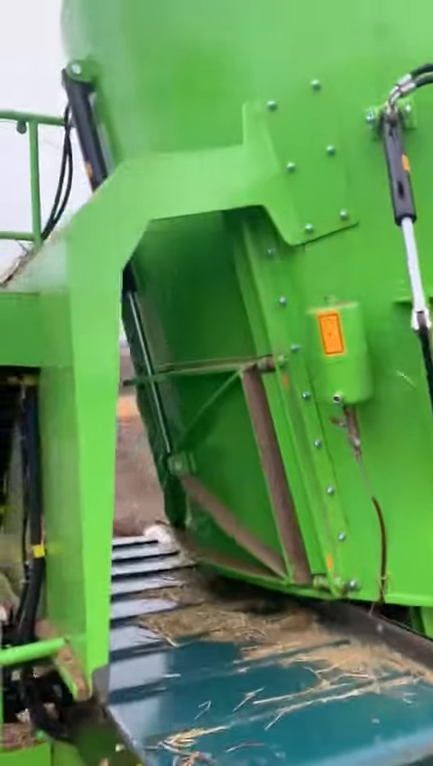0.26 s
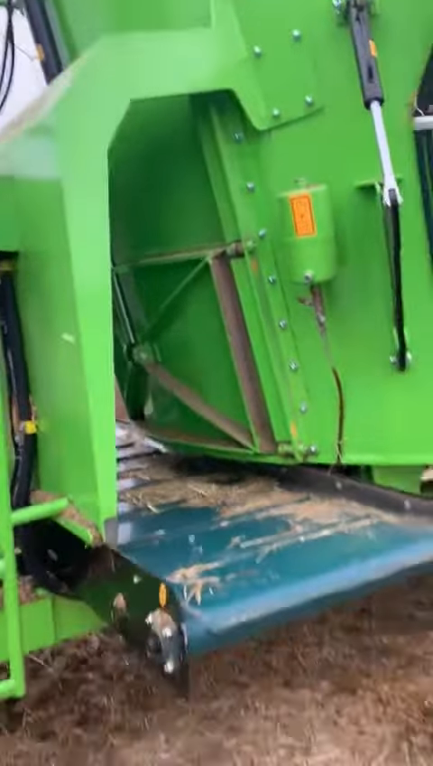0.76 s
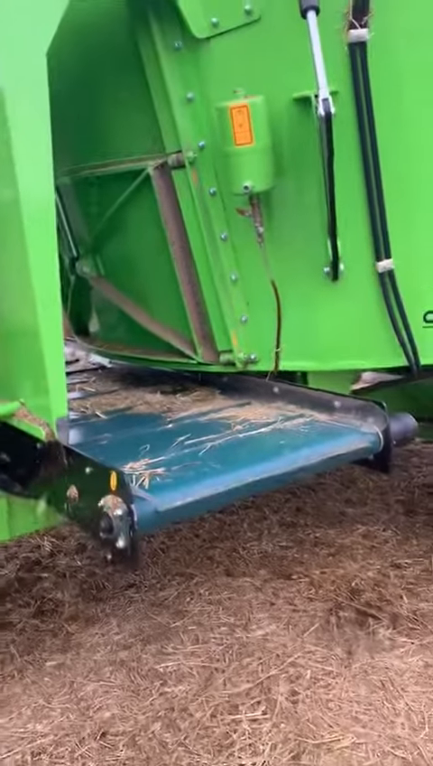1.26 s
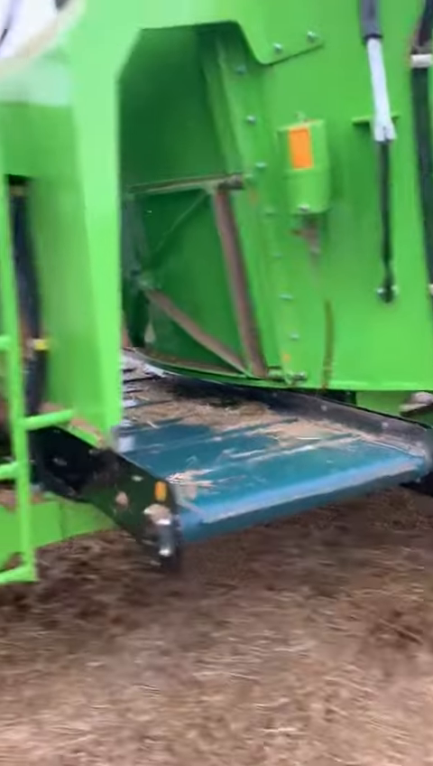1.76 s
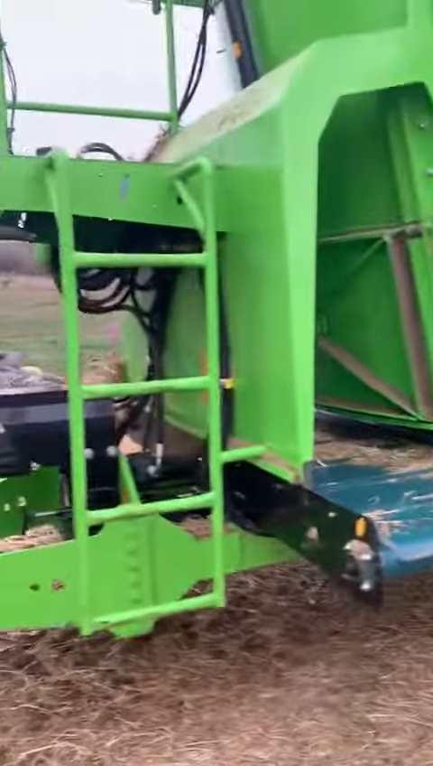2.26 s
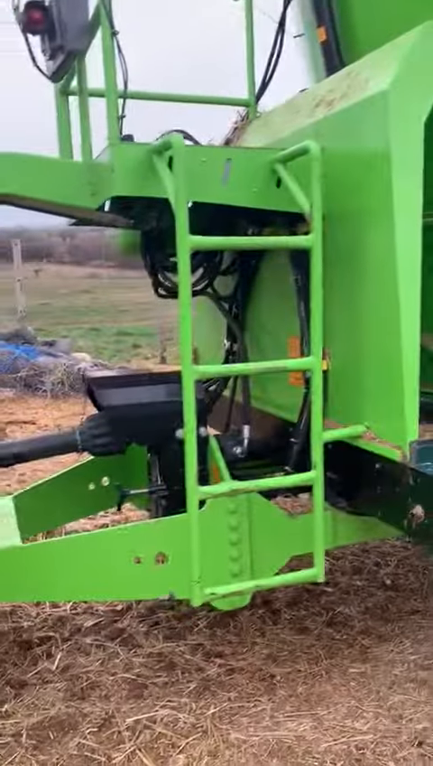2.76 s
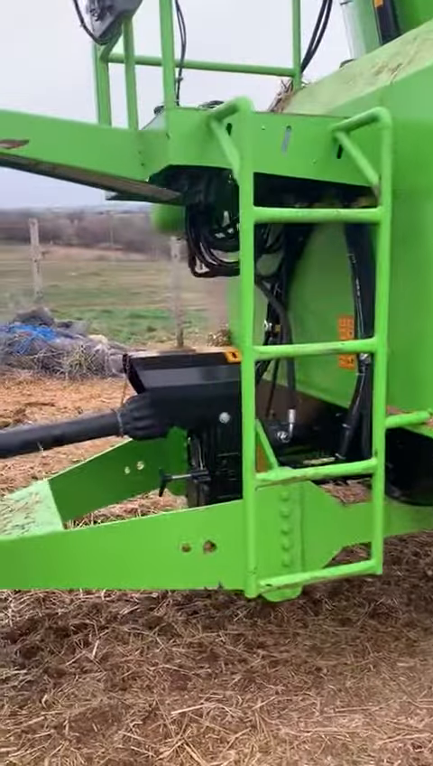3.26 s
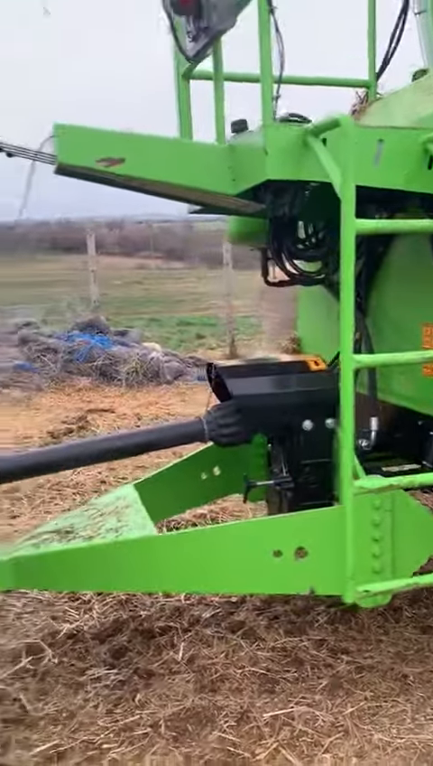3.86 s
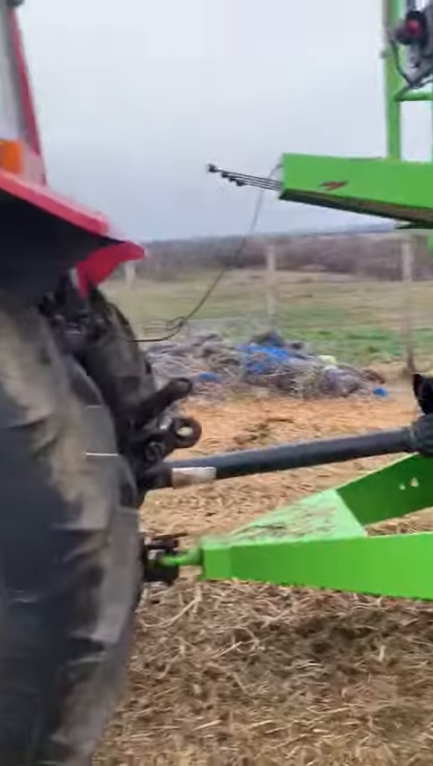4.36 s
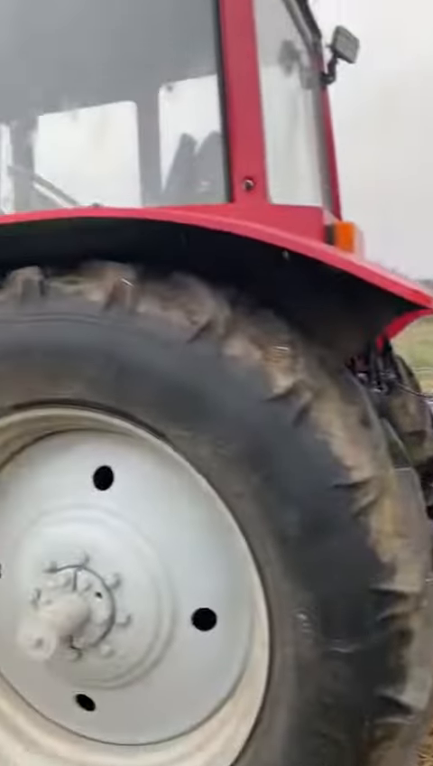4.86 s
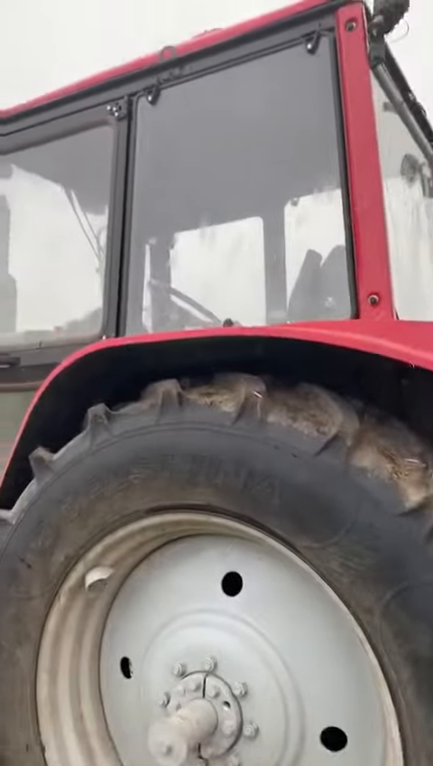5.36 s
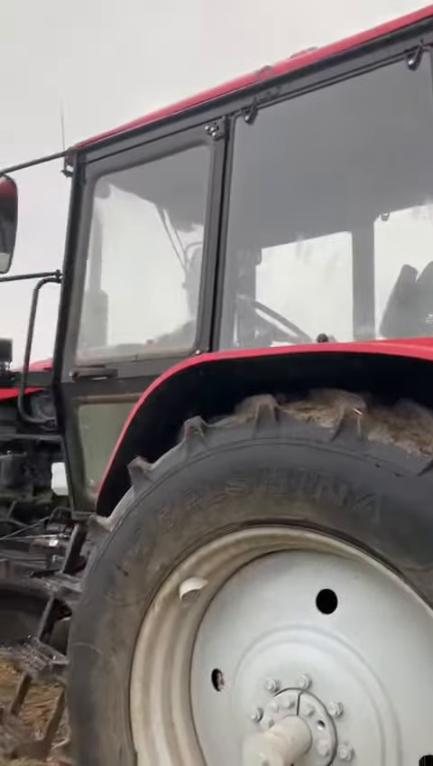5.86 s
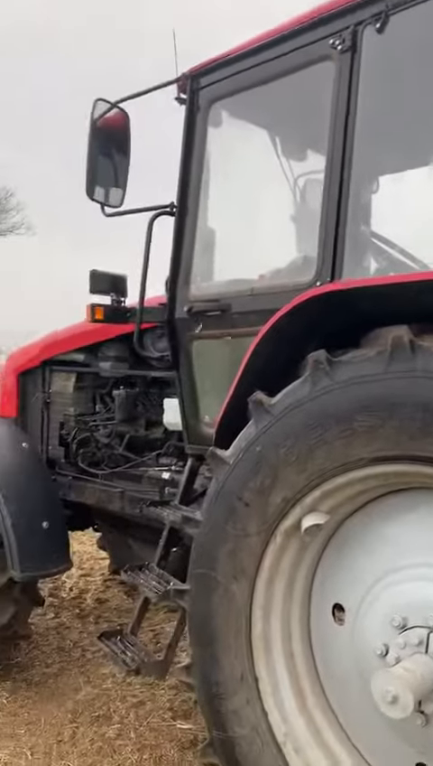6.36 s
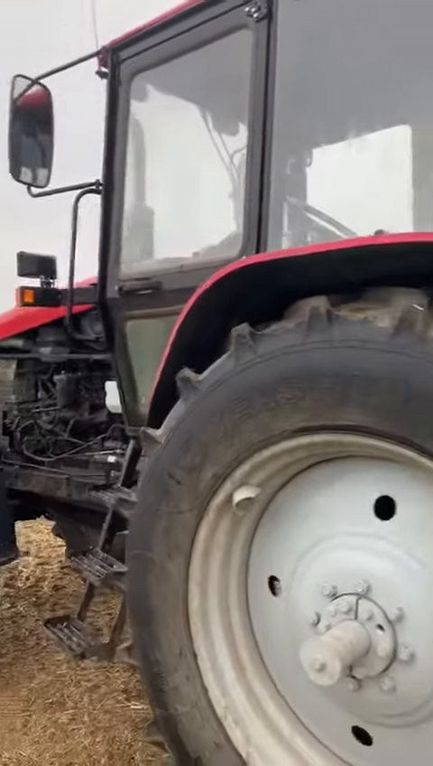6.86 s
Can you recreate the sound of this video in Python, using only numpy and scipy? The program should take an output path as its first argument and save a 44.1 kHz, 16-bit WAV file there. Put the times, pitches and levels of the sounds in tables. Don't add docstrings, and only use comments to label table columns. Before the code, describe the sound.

In an open farmyard, a four-cylinder tractor diesel runs steadily and fast, with dull knocking, tappet clatter and a whining wagon gearbox. Strong gusts slap and rumble on a handheld phone, heaviest in the first few seconds. As the walker leaves the wagon and reaches the tractor, the gear whine drops away and the injector hiss and clatter become louder, closer and brighter, with only scattered wind bumps.

```python
import sys
import numpy as np
from scipy import signal
from scipy.fft import rfft, irfft, next_fast_len
from scipy.io import wavfile
from scipy.ndimage import uniform_filter1d, map_coordinates

SR = 44100
rng = np.random.default_rng(int(sys.argv[2]) if len(sys.argv) > 2 else 0)


def to_wav(s):
    ch = np.atleast_2d(s).T
    pcm = np.round(np.clip(ch, -1, 1) * 32767)
    wavfile.write(sys.argv[1], SR, pcm.astype(np.int16))


def gain_from_db(level_db):
    decades = np.asarray(level_db, float) / 20
    return 10 ** decades


N = 313992

# time in seconds, corner in Hz below which sound is mono, width of the wind in dB.
WIND_GUARD = [(0, 394, -7.5), (2.6, 330, -2.5), (2.9, 192, -2), (3.6, 138, 6), (4.8, 50.3, 3),
              (5.5, 30.4, 2.5), (5.9, 200, 3), (6.4, 201, -33), (7.12, 268, -14)]


def unit(x):
    return x / np.sqrt(np.mean(x ** 2) + 1e-20)


def along(points, hz):
    f, v = np.transpose(points)
    return np.interp(np.log(hz + 1), np.log(f + 1), v)


def curves(rows):
    s, *cols = np.transpose(rows)
    return [np.interp(np.arange(N) / SR, s, c) for c in cols]


def wobble(rate, shape=lambda v: v):
    s = np.arange(0, N / SR + .01, .002)
    knots = rng.standard_normal(int(N * rate / SR) + 4)
    smooth = map_coordinates(knots, [s * rate])
    return np.interp(np.arange(N) / SR, s, shape(smooth))


def filtered(x, response):
    m = next_fast_len(N + 8192)
    return irfft(rfft(x, m) * response(np.fft.rfftfreq(m, 1 / SR)), m)[..., :N]


def ports(direct, diffuse):
    # frequency in Hz, phase lead of the left port in radians.
    left_lead = [(100, 0), (700, 1.8), (1500, 1.3), (2000, 2), (2600, 2.9), (3300, 3.2), (3900, 2.4),
                 (4500, 3.1), (5500, 3.4), (6050, 4.8), (7000, 6.3), (7700, 6.7), (8300, 7.9), (9000, 9.2),
                 (10300, 9.6), (11000, 11), (11600, 12.6)]
    # frequency in Hz, direct share of the power from 0 to 1.
    direct_share = [(100, .9), (500, .55), (1500, .72), (2600, .84), (3300, .82), (4000, .55), (4600, .93),
                    (5600, .97), (12000, .97)]

    def share(hz):
        return np.clip(along(direct_share, hz), 0, 1)

    def lead(hz):
        return np.sqrt(share(hz)) * np.exp(.5j * along(left_lead, hz) * np.array([[1], [-1]]))

    return filtered(direct, lead) + filtered(diffuse, lambda hz: np.sqrt(1 - share(hz)))


def patchy(x, depth_db):
    z = signal.stft(x, nperseg=1024)[2]
    field = rng.standard_normal(z.shape[1:])
    field = uniform_filter1d(uniform_filter1d(field, size=6, axis=0), size=10, axis=1)
    return signal.istft(z * gain_from_db(depth_db * unit(field)), nperseg=1024)[1][:, :N]


def tones(orders, firings, sway_db, slip):
    total = np.zeros(N)
    for multiple, db in orders:
        level = wobble(5, lambda v: np.sqrt(2) * gain_from_db(db + sway_db * v))
        total += level * np.sin(2 * np.pi * multiple * firings + slip * wobble(9))
    return total


def knocking(firings, spectrum, depth, sharp, cylinder_db, tick_db):
    # time in seconds, level in dB.
    panel_echo = [(0, 3.5), (.35, 6), (.65, 4.5), (.85, 1), (1.1, 2.5), (1.35, -3.5), (1.7, 1.5), (2.2, 2),
                  (2.6, 0.5), (3.3, 4), (3.7, 3.5), (4.4, 2.5), (4.9, 2), (5.3, 1), (5.6, 6.5), (6.1, 1),
                  (6.5, 2), (7.12, 3)]
    index = firings.astype(int)
    cylinder = np.array([1, -.6, .4, -1])[index % 4]
    each_firing = rng.standard_normal(index.max() + 1)[index]
    gate = 1 + depth * gain_from_db(cylinder_db * (cylinder + each_firing)) * np.exp(-sharp * (firings % 1))
    ticks = np.repeat(gain_from_db(tick_db * rng.standard_normal(N // 40 + 1)), 40)[:N]
    sway = wobble(7, lambda v: gain_from_db(.4 * v)) * wobble(20, lambda v: gain_from_db(.4 * v))
    direct, *diffuse = gate * ticks * sway * rng.standard_normal((3, N))
    echoes = gain_from_db(curves(panel_echo)[0] + 1.5 * wobble(14))
    return unit(filtered(ports(direct, echoes * np.array(diffuse)), spectrum))


def exhaust_beat(firings):
    # multiple of the firing rate, level in dB.
    exhaust_orders = [(1, -7), (1.5, -19), (2, -1.5), (2.5, -8.5), (3, -12), (5, -18.5), (7.5, -20.5)]
    # time in seconds, level of the beat in dB.
    beat_level = [(0, -32), (1, -29), (2, -30), (2.8, -25.5), (3.3, -27), (3.65, -23), (4, -27.5),
                  (4.6, -21), (5.1, -29.5), (5.5, -26.5), (6.1, -24.5), (6.5, -23.5), (7.12, -20.5)]
    return gain_from_db(curves(beat_level)[0]) * tones(exhaust_orders, firings, sway_db=2, slip=.7)


def block_knock(firings, near_db):
    # frequency in Hz, spectral level in dB per Hz.
    block_colour = [(30, -87), (70, 4.5), (200, 0), (290, -3), (450, 2.5), (700, 2.5), (1000, 0), (1450, 2),
                    (1800, 2), (2300, -16), (3000, -71), (4000, -120)]
    # centre in Hz, width in Hz, gain in dB.
    cover_rings = [(446, 23, 2.5), (1029, 57, 8), (1214, 120, 4), (1370, 360, 3)]

    def response(hz):
        rings_db = sum(db / (1 + (2 * (hz - centre) / width) ** 2) for centre, width, db in cover_rings)
        return gain_from_db(along(block_colour, hz) + rings_db)

    block = knocking(firings, response, depth=.6, sharp=2, cylinder_db=1.8, tick_db=.3)
    return gain_from_db(-28 + .6 * near_db) * patchy(block, 2.2)


def tappet_and_injector_clatter(firings, near_db, tappet_db):
    # frequency in Hz, spectral level in dB per Hz.
    tappet_colour = [(1200, -60), (1900, 0), (2300, 0), (3100, -4), (3800, -8), (4200, -8.5), (4450, -12),
                     (4700, -10), (5200, -12), (6000, -20), (7500, -60), (9000, -120)]
    # frequency in Hz, spectral level in dB per Hz.
    hiss_colour = [(3000, -60), (4800, -6), (5600, 0), (6500, 0), (7800, -3), (8100, 2), (9200, 0),
                   (10200, 0), (11500, -4), (11900, -15), (12150, -120)]
    tappets = knocking(firings, lambda hz: gain_from_db(along(tappet_colour, hz)),
                       depth=.5, sharp=2.5, cylinder_db=1.3, tick_db=.6)
    hiss = knocking(firings, lambda hz: gain_from_db(along(hiss_colour, hz)),
                    depth=.6, sharp=2, cylinder_db=1.8, tick_db=.5)
    shade_hz, shade_db = 8860, -4 + .25 * near_db
    hiss = hiss + (gain_from_db(shade_db) - 1) * filtered(hiss, lambda hz: hz > shade_hz)
    hiss_db = -45.5 + near_db + .97 * wobble(3.6) + .5 * wobble(10)
    return patchy(gain_from_db(tappet_db) * tappets + gain_from_db(hiss_db) * hiss, 1.8)


def pump_and_fan(firings, near_db):
    # multiple of the firing rate, level in dB.
    pump_orders = [(13, -39), (26, -35), (18, -41), (24, -41)]
    # multiple of the firing rate, level in dB.
    fan_orders = [(10 / 3, -32.5), (14 / 3, -37), (50 / 3, -37)]
    clear_s, clear_width_s, clear_db = 6.05, .27, 8
    unshaded_db = clear_db / (1 + np.exp((clear_s - np.arange(N) / SR) / clear_width_s))
    gain = gain_from_db(-7.5 + .26 * near_db + unshaded_db)
    return gain * tones([*pump_orders, *fan_orders], firings, sway_db=3.5, slip=1.6)


def wagon_gearbox(firings):
    # multiple of the firing rate, level in dB.
    gearbox_orders = [(3.08, 0), (6.16, -11), (9.24, -19), (15.75, -20), (20.4, -16)]
    # time in seconds, level in dB.
    gearbox_level = [(0, -34.5), (.8, -28.5), (1.8, -26.5), (2.9, -28.5), (3.6, -27), (4, -39.5),
                     (4.4, -49), (7.12, -55)]
    return gain_from_db(curves(gearbox_level)[0]) * tones(gearbox_orders, firings, sway_db=4, slip=2)


def upper_gear_whine(firings, tappet_db):
    # multiple of the firing rate, level in dB.
    whine_orders = [(52, -24), (208 / 3, -21), (78, -23)]
    return gain_from_db(tappet_db) * tones(whine_orders, firings, sway_db=4, slip=2)


def panel_glints(firings):
    # multiple of the firing rate, centre in seconds, half length in seconds, level in dB.
    glint_tones = [(15.75, 1.65, .5, -43), (9.24, 3.55, .35, -39), (16.6, 4.9, .55, -38),
                   (13, 6.6, .45, -40), (69.9, 5.6, .2, -45.5), (69.3, 6.58, .25, -50),
                   (7.45, 1.6, .6, -40), (10 / 3, 6.25, .4, -31), (23.8, 4.9, .45, -37),
                   (20.2, 5.6, .45, -37), (22.4, 3, .6, -39), (20.6, .9, .6, -40), (26, 6.8, .22, -38),
                   (16.4, 3.1, .5, -39), (9, 1.65, .45, -40), (10.4, 1.6, .3, -41), (7.5, 6.3, .75, -39),
                   (6.2, 4.1, .3, -42), (40, 5.9, .15, -44), (52, 6.65, .2, -48), (18, 6.3, .4, -38)]
    total = np.zeros(N)
    for multiple, s, half_s, db in glint_tones:
        swell, = curves([(s - 1.2 * half_s, 0), (s - .6 * half_s, 1),
                         (s + .6 * half_s, 1), (s + 1.2 * half_s, 0)])
        total += swell * tones([(multiple, db)], firings, sway_db=3, slip=min(.4 + multiple / 12, 1.8))
    return total


def engine():
    # time in seconds, firings per second (bent a little by the walker's steps).
    firing_rate = [(0, 60.2), (1.1, 60), (2.3, 60.3), (2.6, 59.6), (3.8, 59.6), (4.1, 58.85), (4.7, 59.7),
                   (5.05, 59.2), (5.5, 60.5), (6.1, 60.1), (6.6, 60.2), (7.12, 59.8)]
    # time in seconds, injector level relative to that at the wagon in dB.
    approach = [(0, -0.5), (1.1, 2), (1.9, 2.5), (2.6, 6.5), (3.3, 5.5), (3.7, 5), (4.1, 7.5), (4.7, 12),
                (5.1, 12), (5.6, 8.5), (6.1, 10), (6.5, 13), (7.12, 12)]
    firings = np.cumsum(curves(firing_rate)[0]) / SR + .43
    near_db, = curves(approach)
    tappet_db = -34 + .61 * near_db
    lines = exhaust_beat(firings) + pump_and_fan(firings, near_db)
    lines = lines + wagon_gearbox(firings) + upper_gear_whine(firings, tappet_db)
    noise = block_knock(firings, near_db) + tappet_and_injector_clatter(firings, near_db, tappet_db)
    return noise + ports(lines, np.zeros((2, N))) + panel_glints(firings)


def airflow():
    # time in seconds, level in dB.
    breeze = [(0, -23.5), (.45, -16), (.8, -25), (1.3, -23.5), (1.9, -24), (2.4, -17), (2.7, -27.5),
              (3.1, -26), (3.7, -27), (4.1, -28.5), (4.5, -29.5), (4.75, -26), (5.2, -24.5), (5.55, -31),
              (5.9, -25.5), (6.2, -31.5), (6.5, -21), (7.12, -28)]
    # centre in seconds, half length in seconds, level in dB, colour (0 rumble to 3 scrape).
    gusts = [(.075, .03, -21, 1.3), (.245, .055, -14, 1.5), (.32, .05, -16.5, 2), (.38, .022, -15, 2.5),
             (.57, .08, -20, 1.5), (.67, .03, -21, 1.2), (.965, .02, -17, 2.1), (1.045, .035, -17, 1.6),
             (1.11, .08, -18.5, 1.3), (1.45, .05, -23, .7), (1.82, .02, -21, 1.2), (1.88, .03, -20, 1.1),
             (2.02, .04, -22, .9), (2.17, .05, -16.5, 1.1), (2.25, .05, -17.5, 1.4),
             (2.325, .035, -17, 1.5), (2.52, .04, -20, 1.1), (2.8, .03, -21, .8), (2.85, .03, -19, 1.5),
             (3.04, .05, -21, .5), (3.35, .06, -23, .4), (3.56, .06, -21, .6), (3.985, .03, -22.5, 2),
             (4.41, .08, -23, .1), (4.83, .02, -22, .8), (4.95, .03, -21, 1.1), (5.06, .035, -23, 1.8),
             (5.165, .02, -24, 1.7), (5.24, .03, -22, .2), (5.28, .04, -18.5, 1.5), (5.42, .05, -18.5, 3),
             (5.7, .03, -25, .8), (5.98, .04, -24, .4), (6.33, .04, -24, 1.2), (6.6, .05, -23, 1.1),
             (6.9, .05, -24, 1.1)]
    t, layer = np.arange(0, N / SR + .01, .002), np.arange(4)[:, None]

    def loss_db(colour):
        above_db, below_db = 9, 5
        return np.where(layer > colour, above_db * (layer - colour) ** 2, below_db * (colour - layer))

    power = gain_from_db(np.interp(t, *np.transpose(breeze)) - loss_db(.2)) ** 2
    for s, half_s, db, colour in gusts:
        u = np.abs(t - s) / (np.abs(half_s) * np.where(t < s, .6, 1))
        power = power + gain_from_db(db - loss_db(colour)) ** 2 * np.exp(-u ** 2.6)
    return [np.interp(np.arange(N) / SR, t, np.sqrt(p)) for p in power]


def eddy_slaps():
    # start in seconds, peak
    # in dB, frequency in Hz.
    shed_eddies = [(0.052, -1.5, 453), (0.073, -4, 143), (0.227, 4, 434), (0.25, 3.5, 299),
                   (0.287, 1, 106), (0.306, 0, 483), (0.344, -1, 524), (0.369, 0.5, 372),
                   (0.371, 0.5, 68.5), (0.551, 0, 238), (0.571, -2, 104), (0.61, -4, 218),
                   (0.642, -4.4, 185), (0.673, -4.5, 273), (0.957, 2, 405), (1.012, 3.5, 334),
                   (1.038, 4, 373), (1.095, 2, 214), (1.126, -2, 370), (1.131, -1, 174),
                   (1.197, -4.5, 250), (1.427, -5, 141), (1.616, -6, 185), (1.81, -2.5, 181),
                   (2.011, -7, 218), (2.092, -2, 215), (2.125, -7.1, 320), (2.182, 2, 314),
                   (2.238, -2.5, 276), (2.264, -1.5, 457), (2.288, 0, 524), (2.311, 2, 297),
                   (2.315, 0, 122), (2.339, -1.5, 96), (2.351, 1.5, 468), (2.373, -5, 208),
                   (2.511, -4, 161), (2.545, -7.5, 376), (2.782, -7, 147), (2.852, 3.7, 94),
                   (2.872, -1, 234), (2.978, -1.5, 173), (3.005, -8, 171), (3.292, -8, 172),
                   (3.317, -7, 167), (3.507, -2.5, 113), (3.573, 0, 197), (4.37, -7, 134),
                   (4.401, -6, 145), (4.809, 0.5, 116), (4.937, -4, 142), (5.151, -5, 460),
                   (5.258, -3.5, 398), (5.275, -1, 303), (5.295, -12, 409), (5.402, -4.5, 517),
                   (5.402, 3, 106), (6.386, -5, 185), (6.592, -9, 218), (6.885, -10, 186),
                   (0.074, -6, 61.6), (.17, -5, 61), (.265, -5, 65.5), (.555, -8, 70), (0.664, -7.5, 61.6),
                    (.975, -6, 65.4), (1.046, -2, 64), (1.106, -15, 64), (1.44, -7, 69.4),
                    (1.804, -7, 62.7), (1.86, -7, 66.7), (2.165, -3, 71), (2.201, 1, 78), (2.234, -3, 62.6),
                    (2.315, -3, 62.7), (2.5, -11, 58.4), (3.01, -5, 66), (3.35, -8, 61), (3.572, -3, 60),
                    (4.329, -7, 63.5), (4.43, -8.5, 58), (4.815, -3, 71.4), (5.059, -9.5, 70.6),
                    (5.145, -3, 71), (5.222, -2, 70), (5.286, -12, 64.5), (5.375, -6, 74), (5.97, -8, 75),
                   (.213, -4.5, 605), (.258, 2.5, 620), (.304, -10, 835), (.37, -5, 1140), (.389, -4, 770),
                    (.962, -9, 895), (2.336, -5, 960), (2.828, -4, 800), (3.928, -10, 149),
                    (3.976, -3, 820), (3.992, -8, 428), (4.012, -6, 208), (5.405, -2, 895),
                    (5.43, 2.5, 1300)]
    t, slaps = np.arange(SR // 8) / SR, np.zeros(N + SR)
    for s, db, hz in shed_eddies:
        swell = t * hz / .93
        pulse = swell * np.exp(1 - swell) * np.cos(2 * np.pi * hz * t + rng.uniform(0, 2 * np.pi))
        slaps[round(s * SR):][:len(t)] += gain_from_db(db - 2) * pulse
    return slaps[:N]


def wind():
    # frequency in Hz, spectral level in dB per Hz.
    rumble = [(15, -47), (30, -18.5), (55, 0), (100, -1), (150, -4.5), (250, -19.5), (500, -120)]
    # frequency in Hz, spectral level in dB per Hz.
    flutter = [(40, -120), (80, -16.5), (150, 3.5), (250, 0.5), (400, -4.5), (700, -19.5), (1400, -120)]
    # frequency in Hz, spectral level in dB per Hz.
    rasp = [(120, -120), (250, -23.5), (400, 1), (650, -4.5), (1000, -13.5), (2000, -25), (4000, -120)]
    # frequency in Hz, spectral level in dB per Hz.
    scrape = [(250, -120), (500, -14), (800, 0), (1300, -3), (2200, -13), (4200, -120)]
    lumps_db = 1.6 * wobble(35)
    flow = np.zeros((2, N))
    for gain, colour, trim_db in zip(airflow(), (rumble, flutter, rasp, scrape), (-2, -1, -4, -3)):
        noise = filtered(rng.standard_normal((2, N)), lambda hz: gain_from_db(along(colour, hz)))
        flow += gain * gain_from_db(trim_db) * unit(gain_from_db(lumps_db + 1.8 * wobble(50)) * noise)
    both = flow[0] + gain_from_db(-9) * eddy_slaps()
    apart = flow[1] * gain_from_db(curves(WIND_GUARD)[1])
    return np.array([both + apart, both - apart])


def scene():
    return wind() + engine() * gain_from_db([[.4], [-.4]])


def band_limit(x):
    return signal.sosfilt(signal.butter(12, 12000, fs=SR, output="sos"), x)


def record(dry):
    x = dry / (1 + np.abs(dry / .95) ** 6) ** (1 / 6)
    mid, side = (x[0] + x[1]) / 2, (x[0] - x[1]) / 2
    hz, t, z = signal.stft(side, SR, nperseg=2048)
    s, corner_hz, _ = np.transpose(WIND_GUARD)
    z = z / (1 + (np.interp(t, s, corner_hz) / (hz[:, None] + 1)) ** 16)
    side = signal.istft(z, SR, nperseg=2048)[1][:N]
    return band_limit(np.array([mid + side, mid - side]))


dry = scene()
out = record(dry)
to_wav(out)
```